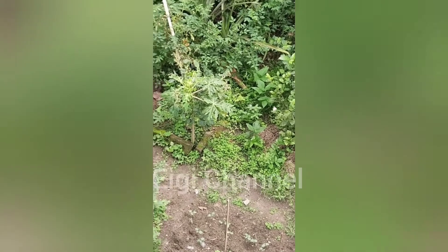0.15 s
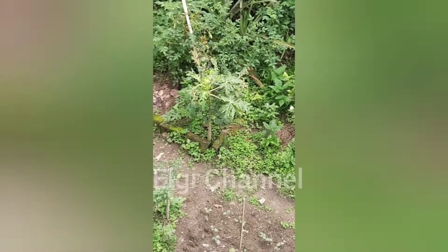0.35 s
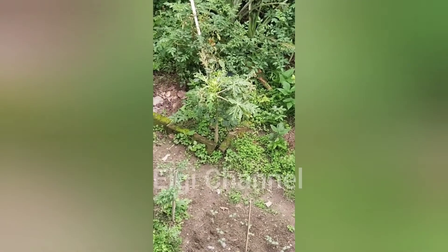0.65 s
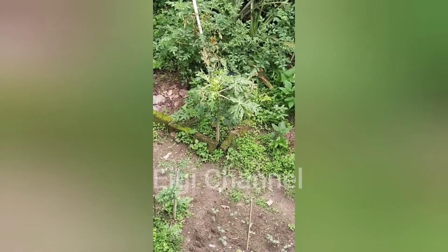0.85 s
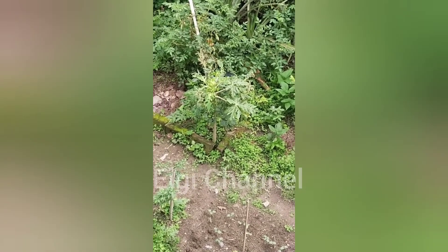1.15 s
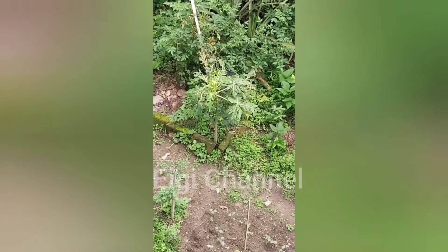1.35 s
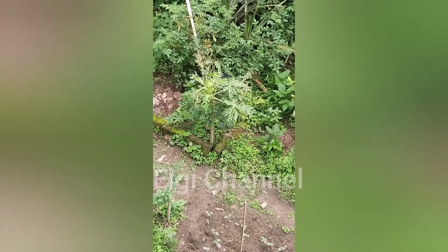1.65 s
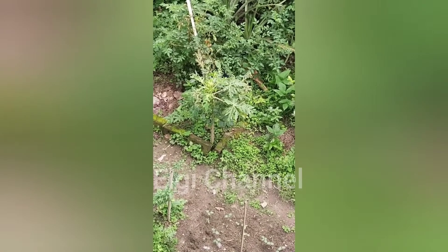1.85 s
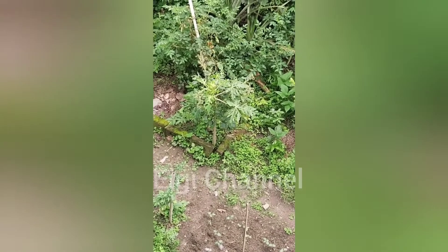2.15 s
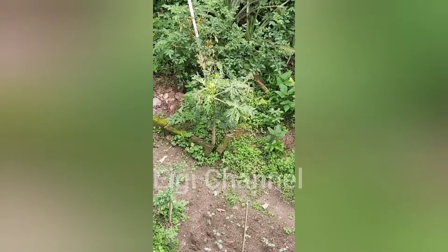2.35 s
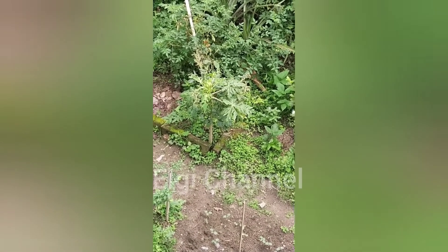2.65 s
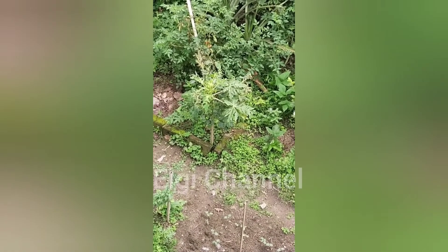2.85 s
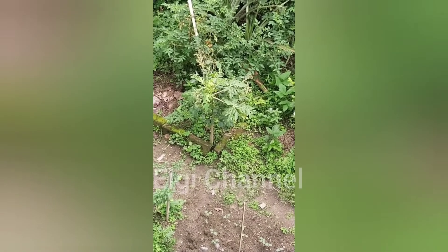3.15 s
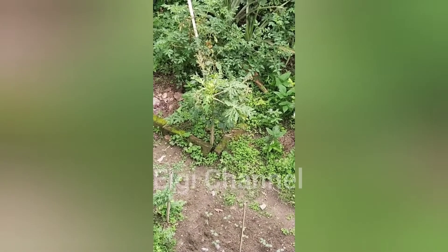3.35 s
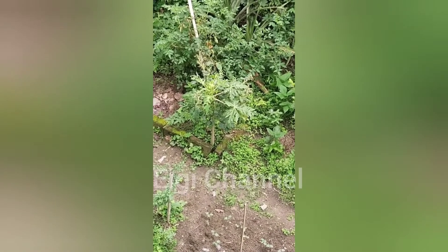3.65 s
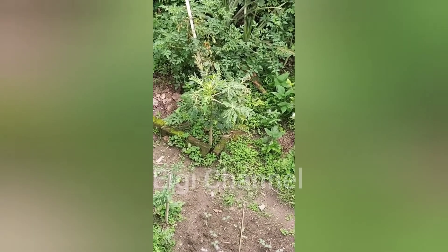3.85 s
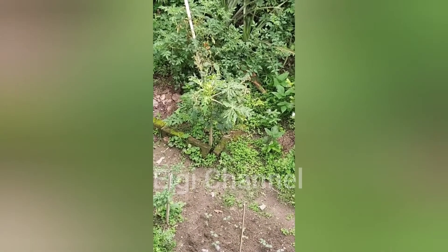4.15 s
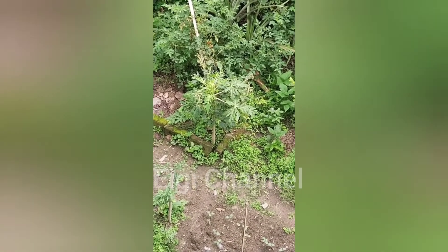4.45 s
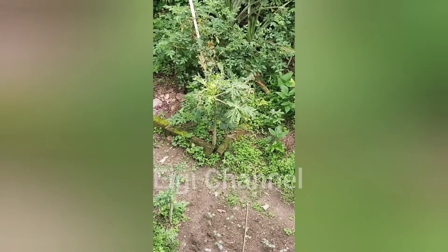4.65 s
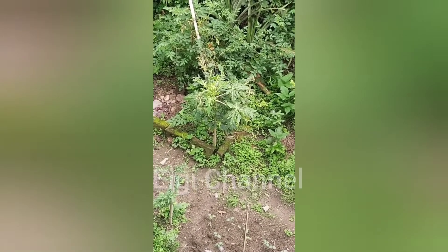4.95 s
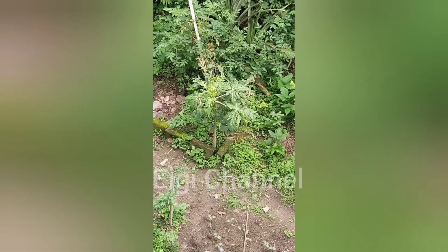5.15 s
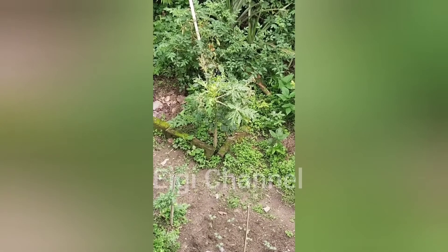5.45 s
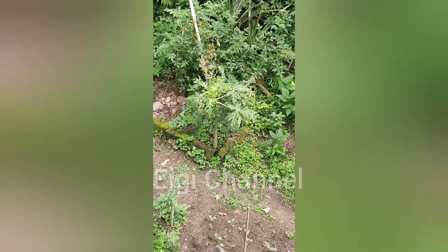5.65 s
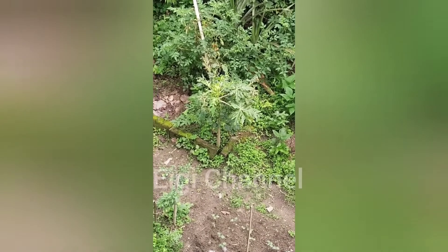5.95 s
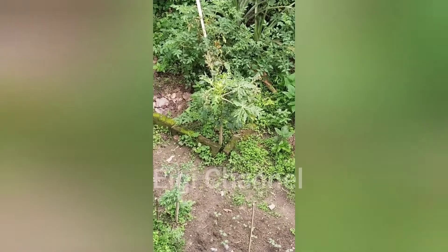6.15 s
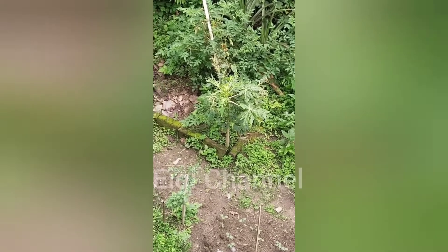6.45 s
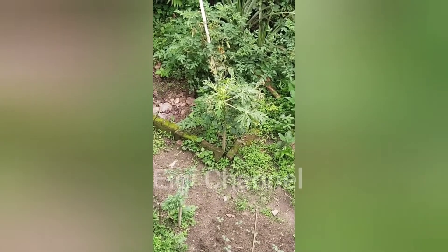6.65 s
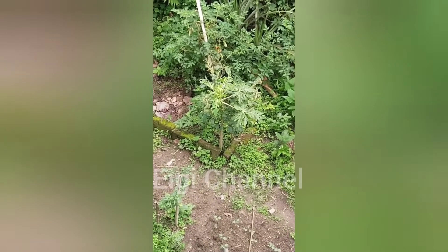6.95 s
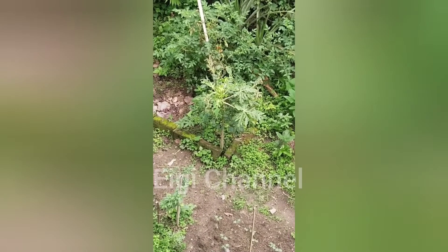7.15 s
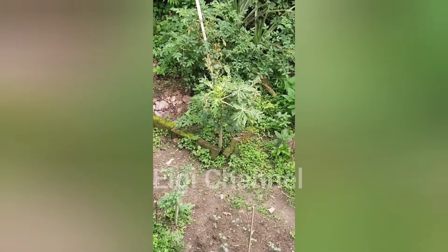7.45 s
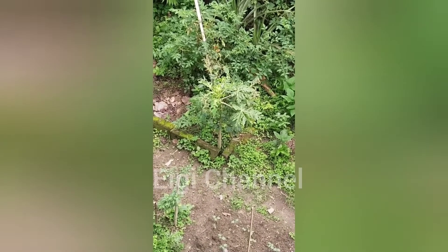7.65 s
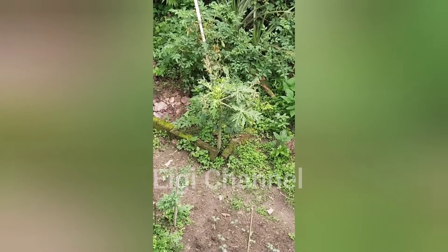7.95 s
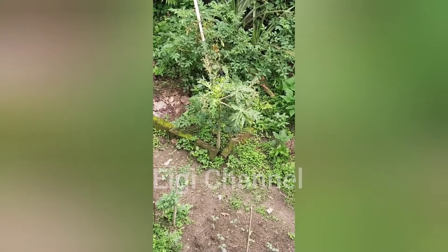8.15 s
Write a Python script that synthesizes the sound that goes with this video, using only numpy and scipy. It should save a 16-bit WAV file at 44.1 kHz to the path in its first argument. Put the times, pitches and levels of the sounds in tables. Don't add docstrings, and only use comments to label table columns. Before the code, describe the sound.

Outdoor garden, handheld stereo. On the right, a loud bird whistle is already near its crest at 0 s and drops away into a ringing echo. Further calls begin at about 1.8, 3.6, 5.6 and 8.0 s, each lasting roughly half a second: a sliding start near 1.1 kHz, a slow climb, a quick leap to about 1.3-1.4 kHz, then a hoarse fall. The third is loudest; the last is highest and runs to the end. Between calls are faint hoarse caws near 0.5, 3.3 and 4.7 s, dove coos from 2 to 5 s, distant engine hums at 1.3-3.2 s, and a brief leaf rustle around 4.1 s. Thin cricket buzzing near 7 and 9 kHz comes and goes over low distant traffic. The left side is muffled: scattered low finger creaks, strongest around 3.8-4.2 and 6.3-6.7 s, with dull pops at 1.4, 3.0 and 4.2 s.

```python
import sys
import numpy as np
from scipy import signal
from scipy.fft import rfft, irfft, next_fast_len
from scipy.io import wavfile
from scipy.ndimage import uniform_filter1d, map_coordinates

SR = 44100
rng = np.random.default_rng(int(sys.argv[2]) if len(sys.argv) > 2 else 0)


def convert_level_to_amplitude(level_db):
    exponent = np.asarray(level_db, float) / 20
    return 10 ** exponent


def unload_audio(sound):
    columns = np.transpose(np.atleast_2d(sound))
    steps = np.round(np.clip(columns, -1, 1) * 32767)
    wavfile.write(sys.argv[1], SR, steps.astype(np.int16))


N = 365148

# nearest t/s, width t/s, level/dB
DRONE = [(.2, 0.215, -56), (.72, 0.14, -64.5), (1.35, 0.298, -66), (2.0, 0.25, -62), (2.799, 0.58, -76),
         (4.1, .2, -58.5), (5.749, 0.2, -67), (6.4, 0.295, -65), (8.1, 0.106, -71)]
# f/Hz, level/dB per Hz
TRAFFIC = [(25, -34.5), (45, -14), (75, 3.5), (125, 6), (200, 0), (290, -10.5), (400, -19), (600, -23.5)]
DRONE_DB = -71.5
# f/Hz, level/dB per Hz
GARDEN = [(200, -104), (400, -104), (1200, -108.5), (2000, -111), (3000, -115), (4200, -119), (5500, -122),
          (6300, -114), (7600, -110), (9500, -116), (11000, -122), (13500, -124), (15400, -121)]
COVERED = [(40, -105), (70, -99), (120, -94), (200, -106), (280, -110), (700, -112), (2000, -114),
           (4500, -119), (6000, -122), (8500, -120), (13000, -123), (15500, -123)]
LEAK_DB = -42

# start t/s, end t/s, level/dB
LOW_SINGER = [(-2.5, 1.1, -78.5), (1.19, 2.1, -78), (2.5, 2.7, -77), (4, 3.35, -77), (3.5, 4.5, -75.5),
              (5, 6.03, -76), (6.5, 9, -74)]
HIGH_SINGER = [(.62, 1.85, -76.5), (2.8, 3.65, -79), (4.7, 5.8, -79.5), (6.6, 7.87, -76.5)]

# crest t/s, opening f/Hz, lowest f/Hz, crest f/Hz, early share of the rise [0-1]
KOEL = [
    (.056, 1096, 1070, 1268, 0.14),
    (2.11, 1115, 1048, 1319, .55),
    (3.95, 1165, 1137, 1388, .3),
    (5.997, 1150, 1119, 1412, .15),
    (8.36, 1230, 1150, 1438, .3),
]
# leap to the crest t/s, fall t/s
PACE = [(.065, .23), (.08, .23), (.08, .27), (.08, .28), (.08, .27)]
# t/s, whistle level/dB
EFFORT = [
    [(-.27, -55.5), (.002, -36.5), (.024, -26), (.042, -35.5), (.066, -28), (.084, -40), (.114, -27),
     (.15, -41.5), (.17, -51.5)],
    [(1.785, -50), (1.81, -36.5), (1.96, -27.5), (2.02, -27.5), (2.05, -37.5), (2.095, -20.5),
     (2.165, -35.5), (2.19, -30), (2.21, -50.5)],
    [(3.615, -47.5), (3.66, -30), (3.72, -34), (3.79, -28.5), (3.865, -30.5), (3.9, -16), (3.983, -21),
     (4.02, -33.5), (4.06, -48.5)],
    [(5.632, -56.5), (5.655, -41), (5.7, -34.5), (5.815, -29.5), (5.86, -37.5), (5.895, -30),
     (6.005, -24.5), (6.108, -33.5), (6.134, -55)],
    [(8.014, -57.5), (8.044, -35), (8.12, -32.5), (8.184, -40.5), (8.21, -27.5), (8.265, -36.5),
     (8.283, -21.5), (8.46, -34)],
]
# f/Hz, level/dB
BEAK = [(2000, -4), (2700, -9.5), (3600, -10), (4200, -10), (4500, -18), (5150, -25.5), (5500, -6.5),
        (5900, 1.5), (7000, -1), (8200, -5.5), (8950, -18), (9850, -4.5), (11300, -8.5), (12200, -22),
        (14300, -15), (15500, -16)]
# low partials level/dB, upper partials level/dB, low partials' gain at the crest level/dB
BEAK_OPEN = [(-1, 1.5, 3.5), (-5, -0.5, 4), (-8.5, 1.5, 12.5), (0, 2.5, 3.5), (-1, 1, 4)]
# opening catch level/dB, length ratio, top tilt/dB per octave, fourth partial level/dB
GAPE = [(-0.5, 0.982, 3.5, 0), (4, 1.02, 0.5, -4), (-9, .99, -0.09, 0), (-1, 0.984, -1.5, 1),
        (-3.5, 0.986, 2.5, 2)]
# fourth partial's gain at the crest, level/dB
FOURTH_CREST = [-7.5, 1.5, 9.5, -10, -6]
# strength of the hoarse ending, level/dB
RASP = [-3.5, 7, 9.5, 1.5, 0]
SCOOP, SCOOP_S, SETTLE_S = .14, .005, .045
CREEP_FROM_S, DROP_CURVE = .1, 1.6
COLLAPSE_S, COLLAPSE_DB = 0.084, -20
LOW_DB, LOW_FOLLOWS = -58.5, 0.21
HIGH_DB, HIGH_FOLLOWS, HIGH_LIFT_DB = -58, 0.28, 8
TOP_LIFT_DB = 3
CLOSING_DB = 4.5
FUZZ = .5
FACING = 0.3
CREST_CARRIES_DB = 4

# delay t/s, level/dB
WALL = [(.12, -33), (.19, -30), (.208, -29.5), (.226, -31), (.29, -35), (.36, -39.5)]
# f/Hz, time to fall 60 dB t/s
YARD = [(500, 0.68), (1300, 0.503), (3000, 0.85), (7000, 0.052), (14000, 0.16)]
HILL = [(500, 0.092), (2000, 1.63)]
LEAVES = [(1000, 0.4), (6000, 0.061), (14000, 0.26)]
ECHO_DB = -13
AIR_PATCH_DB, TAIL_PATCH_DB, FAR_PATCH_DB, COO_PATCH_DB = 2, 1, 1, 1.5

# start t/s, length t/s, centre f/Hz,
# width f/Hz, level/dB
FAR = [(0.024, 0.15, 247, 54, -49.5), (0.00079, 0.19, 570, 91, -57), (1.16, 0.16, 1970, 50, -72),
       (2.2, 0.23, 2450, 150, -76), (3.43, .2, 3880, 90, -70.5), (0.45, 0.11, 710, 100, -70.5),
       (.55, 0.243, 1120, 150, -67), (.66, 0.4, 3030, 710, -63.5), (.74, .25, 1850, 130, -72),
       (4.7, 0.31, 650, 97, -67), (0.22, 0.16, 2086, 65, -69), (0.126, 0.0845, 870, 550, -55.5),
       (0.13, 0.31, 2400, 1200, -64), (0.317, 0.154, 3520, 900, -68), (1.554, 0.35, 2348, 280, -68),
       (2.1, 0.23, 1340, 610, -58), (2.499, 0.12, 447, 19.6, -70), (2.6, 0.42, 2680, 150, -72),
       (1.33, 0.17, 460, 150, -64), (.52, 0.33, 2445, 110, -67.5), (4.9, 0.33, 2900, 45, -71),
       (3.0, .45, 650, 110, -69.5), (6.42, 0.25, 1010, 62, -72), (7.02, 0.17, 4540, 260, -77),
       (7.2, 0.13, 4500, 90, -82), (7.6, .15, 3350, 90, -79), (7.0, .16, 2800, 80, -77),
       (.5, 0.18, 2900, 70, -76), (.72, .3, 3450, 90, -72), (.9, .3, 2600, 70, -74.5),
       (1.7, 0.61, 700, 92, -69), (2.797, 0.149, 1052, 148, -61.5), (4.419, 0.172, 440, 168.5, -56),
       (4.449, 0.38, 1140, 740, -67), (4.678, 0.17, 430, 166, -59), (5.399, 0.14, 2893, 374, -67.5),
       (6.95, 0.28, 2350, 62, -73), (7.25, 0.17, 1070, 130, -70.5), (7.12, .1, 1290, 60, -76),
       (6.55, 0.27, 1230, 130, -73), (4.497, 0.43, 2900, 380, -76.5)]
# start t/s, length t/s, level/dB, brightness/dB per octave
CAWS = [
    (0.497, 0.61, -64.5, 9.5),
    (1.14, 0.4, -71, -14.5),
    (3.293, 0.65, -60, 2),
    (4.72, 0.692, -62.5, 0),
    (6.9, 0.36, -75.5, 4),
]
# f/Hz, width f/Hz, level/dB
CROW = [(1150, 180, -2), (1883, 150, -4), (2656, 130, -0.5), (3176, 150, -6), (3110, 730, -2),
        (3807, 420, -8.5)]
CAW_OPENS = .2

# start t/s, length t/s, slip rate f/Hz, peak level/dB
SLIPS = [(0.078, 0.242, 135, -59), (0.243, 0.129, 120, -51), (0.498, 0.085, 86.7, -51),
         (.68, 0.0332, 110, -52), (1.105, 0.07, 174, -61.5), (1.26, 0.021, 107, -62.5),
         (1.335, 0.11, 146, -50.5), (1.5, 0.144, 103, -65), (2.153, 0.089, 76, -60),
         (2.46, 0.064, 100, -69.5), (3.19, 0.0592, 97, -54), (4.212, 0.074, 91.4, -48.5),
         (5.74, 0.072, 89, -64), (6.221, 0.095, 92, -54.5), (6.313, 0.1246, 137, -48),
         (6.476, 0.041, 123, -42.5), (6.512, 0.058, 120, -47.5), (6.599, 0.13, 84, -65),
         (6.713, 0.055, 102, -48.5), (6.78, 0.078, 92.6, -65.5), (8.069, 0.1, 102, -54)]
# start t/s, length t/s, first slip rate f/Hz, last slip rate f/Hz, peak level/dB
STEADY = [
    (2.725, 0.072, 143, 118, -53),
    (3.84, 0.097, 97.7, 180.6, -43),
    (3.89, 0.061, 138, 118, -44.5),
    (4.055, 0.081, 73, 181.4, -43.5),
    (4.11, 0.1047, 110, 140, -36.5),
    (5.68, 0.067, 92, 172, -44.5),
    (6.95, 0.083, 183, 66, -52.5),
]
# t/s, peak level/dB, f/Hz
POPS = [
    (1.422, -40, 110),
    (2.988, -41, 129.3),
    (4.224, -37, 168),
    (4.499, -68, 202.5),
    (6.033, -52, 165),
    (6.204, -54, 212.7),
]
CREAK_SHARP, SLIP_SHARP, SLIP_SLOWS = 0.27, 0.2, 0.14

# start t/s, length t/s, first f/Hz, last f/Hz, level/dB
ENGINE = [
    (1.25, 0.4, 136.2, 135.3, -66.5),
    (1.75, 0.53, 136.4, 133.2, -65.5),
    (2.45, 0.8, 144.5, 137.3, -65.5),
]
# start t/s, length t/s, first f/Hz, last f/Hz, level/dB
DOVES = [(2.061, 0.11, 547, 661.2, -63), (2.317, 0.098, 586, 666, -63), (2.402, 0.12, 668, 596, -66.5),
         (2.501, 0.133, 649.5, 639.7, -73), (2.764, 0.044, 600, 630, -54),
         (2.793, 0.2957, 769.7, 701.3, -60), (3.072, 0.12, 639, 568.3, -66.5),
         (3.794, 0.14, 564, 648, -63.5), (3.857, 0.2, 730, 659.6, -67), (3.998, 0.28, 615, 551.8, -66),
         (4.526, 0.256, 547.4, 578, -68.5), (4.691, 0.1386, 576, 634.5, -62.5),
         (4.747, 0.09, 672, 697, -68), (4.824, 0.24, 645, 552.5, -67), (4.5, 0.209, 369, 379.4, -59.5),
         (4.702, 0.08, 360, 339.4, -59.5)]
# start t/s, length t/s, first f/Hz, last f/Hz, level/dB
PIPES = [
    (2.565, .12, 2760, 2844, -72),
    (2.65, .17, 2850, 2470, -71),
    (7.261, .16, 1080, 1058, -79.5),
]
COO_ATTACK_S, COO_RELEASE_S, COO_FADE_DB = 0.029, 0.033, -3
COO_ARCH = .015

# start t/s, end t/s, level/dB
RUSTLE = [(4.05, 4.34, -65)]
# f/Hz, level/dB per Hz
RUSTLE_COLOUR = [(940, -2), (1600, 1), (1920, -8.5), (2290, -2.5), (3510, -13.5), (7350, -3.5),
                 (8480, -16.5), (10800, -13.5), (15400, -24)]


def unit(x):
    return x / np.sqrt(np.mean(x ** 2) + 1e-20)


def along(points, hz):
    f, v = np.transpose(points)
    return np.interp(np.log(hz + 1), np.log(f + 1), v)


def gate(start, end, edge):
    t = np.arange(N) / SR
    return np.clip((t - start) / edge, 0, 1) * np.clip((end - t) / edge + 1, 0, 1)


def bouts(rows, rise_db_per_s, fall_db_per_s):
    t = np.arange(N) / SR
    gain = 0
    for start, end, db in rows:
        before = rise_db_per_s * np.maximum(start - t, 0)
        after = fall_db_per_s * np.maximum(t - end, 0)
        gain = gain + convert_level_to_amplitude(db - before - after)
    return gain


def wobble(rate):
    steps = np.arange(0, N + 16, 16)
    knots = rng.standard_normal(int(N * rate / SR) + 4)
    return np.interp(np.arange(N), steps, map_coordinates(knots, [steps * rate / SR]))


def hiss(gain, length=N):
    m = next_fast_len(length + 8192)
    spectrum = rfft(rng.standard_normal(m)) * gain(np.fft.rfftfreq(m, 1 / SR))
    return irfft(spectrum, m)[:length] * np.sqrt(SR / 2)


def coloured(points):
    return lambda hz: convert_level_to_amplitude(along([(1, -160), (20, -130)] + list(points), hz))


def bump(hz, width_hz):
    return lambda f: np.exp(-((f - hz) / width_hz) ** 2)


def turns(pitch_hz):
    return 2 * np.pi * np.cumsum(pitch_hz) / SR


def echoes(x, decay):
    hz, t, z = signal.stft(rng.standard_normal(SR), SR, nperseg=256)
    fading = z * convert_level_to_amplitude(-60 * t / along(decay, hz)[:, None])
    tail = signal.istft(fading, SR, nperseg=256)[1]
    return signal.fftconvolve(np.pad(x, (300, 0)), tail / np.linalg.norm(tail))[:N]


def patchy(x, depth_db):
    z = signal.stft(x, nperseg=512)[2]
    field = uniform_filter1d(rng.standard_normal(z.shape), size=5, axis=0)
    field = uniform_filter1d(field, size=9, axis=1)
    return signal.istft(z * convert_level_to_amplitude(depth_db * unit(field)), nperseg=512)[1][:N]


def traffic():
    t = np.arange(N) / SR
    swell = convert_level_to_amplitude(DRONE_DB) + sum(convert_level_to_amplitude(db) * np.exp(-((t - s) / width) ** 2) for s, width, db in DRONE)
    drone = swell * convert_level_to_amplitude(2.5 + 1.9 * wobble(13)) * unit(hiss(coloured(TRAFFIC + [(2000, -94.5)])))
    hum = convert_level_to_amplitude(-77.5 + 2 * wobble(1.5)) * unit(hiss(bump(281, 6.8)))
    return drone + hum


def garden_air():
    return patchy(hiss(coloured(GARDEN)), depth_db=AIR_PATCH_DB)


def covered_floor(voices):
    bright = np.diff(voices, n=2, prepend=[0, 0])
    loudness = np.sqrt(np.abs(uniform_filter1d(bright ** 2, size=3000)))
    return (1 + convert_level_to_amplitude(33) * loudness ** .7) * hiss(coloured(COVERED))


def wing_strokes(rate_hz, floor):
    phase = turns(rate_hz * (1 + 0.015 * wobble(1.5)))
    return floor + np.maximum(np.sin(phase), 0) ** 0.69


def crickets():
    low = hiss(bump(6860, 130)) + .3 * hiss(bump(6800, 320)) + 0.12 * hiss(bump(7450, 200))
    low = unit(wing_strokes(45.3, 0.73) * low)
    high = wing_strokes(118.9, 0.93) * hiss(bump(8760, 130))
    third = wing_strokes(112, .3) * hiss(bump(8600, 90))
    high = unit(high + 0.67 * third + 0.49 * hiss(bump(8280, 83)))
    low_gain = convert_level_to_amplitude(4 + 2.2 * wobble(4.7) + 1.8 * wobble(1.6))
    high_gain = convert_level_to_amplitude(3.5 + 1.3 * wobble(9.7) + 1.3 * wobble(2.9))
    return bouts(LOW_SINGER, 30, 30) * low_gain * low, bouts(HIGH_SINGER, 49, 120) * high_gain * high


def koel_tune(t, start, which):
    crest, opening_hz, low_hz, top_hz, creep = np.transpose(KOEL)[:, which]
    leap_s, drop_s = np.transpose(PACE)[:, which]
    age, late = np.maximum(t - start, 0), np.maximum(t - crest, 0)
    ramp = np.clip((age - CREEP_FROM_S) / (crest - start - CREEP_FROM_S), 0, 1)
    leap = np.exp(-(np.maximum(crest - t, 0) / leap_s) ** 1.8)
    rise = creep * ramp + (1 - creep) * leap
    settling = np.exp(-((age - .025) / SETTLE_S) ** 2)
    pitch = low_hz + (top_hz - low_hz) * rise + (opening_hz - low_hz) * settling
    pitch = pitch * (1 - SCOOP * np.exp(-age / SCOOP_S))
    pitch = pitch * np.maximum(1 - (late / drop_s) ** DROP_CURVE, .55)
    lift = np.clip((pitch - low_hz) / (top_hz - low_hz), -1, 1)
    return uniform_filter1d(pitch, size=500), lift


def koel_overtones(t, which, pitch, lift, phase, whistle_db):
    low_open_db, high_open_db, crest_db = np.transpose(BEAK_OPEN)[:, which]
    _, throat, tilt_db, fourth_db = np.transpose(GAPE)[:, which]
    fourth_db = fourth_db + np.take(FOURTH_CREST, which) * lift
    falling = t > np.transpose(KOEL)[0, which]
    low_db = LOW_DB + low_open_db + crest_db * np.maximum(lift, 0) + LOW_FOLLOWS * (whistle_db + 30.0)
    low_db = low_db - CLOSING_DB * (1 - lift) / 2 * falling
    high_db = HIGH_DB + high_open_db + HIGH_FOLLOWS * (whistle_db + 31.5) + HIGH_LIFT_DB * lift
    ladder = np.zeros(N)
    for k in range(2, 15):
        hz = k * pitch
        db = along(BEAK, hz * throat) + (1.2 + .5 * np.sqrt(k)) * wobble(18)
        db = db + (tilt_db + TOP_LIFT_DB * (lift - 1)) * np.log2(np.maximum(hz / 7000, 1))
        if k == 4:
            db = db + fourth_db
        if k < 4:
            db = db + low_db - high_db + 6.5
        tremor = 1 + FUZZ * wobble(170) if k < 5 else 1
        ladder += convert_level_to_amplitude(db) * tremor * np.sin(k * phase) * np.clip((15500 - hz) / 400, 0, 1)
    air = convert_level_to_amplitude(-11.0) * unit(hiss(coloured(BEAK)))
    return convert_level_to_amplitude(high_db - 3.0) * (ladder + air)


def koel():
    t = np.arange(N) / SR
    starts, ends = np.array([(call[0][0], call[-1][0]) for call in EFFORT]).T
    which = np.clip(np.searchsorted(starts - .1, t) - 1, 0, None)
    start, end = starts[which], ends[which]
    breath = []
    for call in EFFORT:
        last_s, last_db = call[-1]
        breath += list(call) + [(last_s + COLLAPSE_S, last_db + COLLAPSE_DB)]
    whistle_db = np.interp(t, *np.transpose(breath))

    def sounding(edge):
        return sum(gate(a, b + COLLAPSE_S, edge) for a, b in zip(starts, ends))

    pitch, lift = koel_tune(t, start, which)
    unsteady = .0012 + .12 * np.clip((t - end + .05) / .06, 0, 1)
    phase = turns(pitch * (1 + unsteady * wobble(260)))
    overtones = sounding(0.03) * koel_overtones(t, which, pitch, lift, phase, whistle_db)

    onset = convert_level_to_amplitude(-260 * np.maximum(t - start - .02, 0))
    catch_db = np.transpose(GAPE)[0, which]
    puff = convert_level_to_amplitude(-2.0 - catch_db) * onset ** 2 * unit(hiss(bump(1800, 750)))
    catch = convert_level_to_amplitude(-52 + catch_db) * onset * (np.sin(2 * phase) + puff)
    rasp = unit(hiss(lambda f: bump(1150, 330)(f) + .35 * bump(1600, 500)(f)))
    hoarse = convert_level_to_amplitude(-48 + np.take(RASP, which) - 450 * np.abs(t - end + .012)) * rasp
    skirt = convert_level_to_amplitude(whistle_db - 40) * unit(hiss(bump(1150, 450)))
    note = convert_level_to_amplitude(whistle_db + 5.0 + 1.2 * wobble(40)) * np.sin(phase)
    whistle = sounding(0.0067) * (note + catch + skirt) + hoarse

    near = whistle + patchy(overtones + echoes(overtones, LEAVES), depth_db=2.3)
    turned_db = -FACING * np.maximum(whistle_db + 35.0, 0)
    carried_db = CREST_CARRIES_DB * (np.maximum(lift, 0) - 0.77)
    sideways = whistle * convert_level_to_amplitude(turned_db + carried_db) * (1 + .7 * wobble(40))
    thrown = sum(convert_level_to_amplitude(db) * np.pad(sideways, (round(s * SR), 0))[:N] for s, db in WALL)
    yard = convert_level_to_amplitude(ECHO_DB) * echoes(whistle + overtones, YARD)
    hill = convert_level_to_amplitude(-17.5) * echoes(sideways, HILL)
    return near + patchy(thrown + yard + hill, depth_db=TAIL_PATCH_DB)


def far_birds():
    sounds = list(FAR)
    for s, length, db, bright in CAWS:
        for hz, width, part_db in CROW:
            late = CAW_OPENS * np.log2(hz / CROW[0][0])
            level_db = db - 6 + part_db + bright * np.log2(hz / 2000)
            sounds.append((s + 0.59 * late * length, (1 - late) * length, hz, width, level_db))
    out = np.zeros(N + SR)
    for s, length, hz, width_hz, db in sounds:
        n = round(length * SR)
        swell = np.sin(np.pi * np.arange(n) / n) ** 1.1
        throat_noise = unit(hiss(lambda f: 1 / (1 + ((f - hz) / width_hz) ** 2), n))
        out[round(s * SR):][:n] += convert_level_to_amplitude(db) * swell * throat_noise
    out = out[:N]
    return patchy(out + convert_level_to_amplitude(-6.5) * echoes(out, YARD), depth_db=FAR_PATCH_DB)


def finger():
    out = np.zeros(N + SR)
    pace, grip = wobble(55), wobble(60)
    slips = [(s, length, rate * (1 + SLIP_SLOWS), rate * (1 - SLIP_SLOWS), db)
             for s, length, rate, db in SLIPS]
    for table, uneven, sharp in ((STEADY, .03, CREAK_SHARP), (slips, .25, SLIP_SHARP)):
        for s, length, first_hz, last_hz, db in table:
            n = round(length * SR)
            u = np.arange(n) / n
            here = slice(round(s * SR), round(s * SR) + n)
            rate = (first_hz + (last_hz - first_hz) * u) * (1 + uneven * pace[here])
            phase = turns(rate) + rng.uniform(0, 2 * np.pi)
            train = sum(sharp ** (k - 1) * np.cos(k * phase + 0.42 * k) for k in range(1, 8))
            out[here] += convert_level_to_amplitude(db + 13 * uneven * grip[here]) * np.sin(np.pi * u) ** 0.59 * train
    t = np.arange(SR // 10) / SR
    for s, db, hz in POPS:
        ring = convert_level_to_amplitude(db + 12.0 - 60 * t / 0.021) * np.sin(2 * np.pi * hz * t)
        out[round(s * SR):][:len(t)] += ring * (1 - np.exp(-t / 0.00083))
    return out[:N] - uniform_filter1d(out[:N], size=700)


def engine_pulls_and_coos():
    out = np.zeros(N)
    sway_db, waver = 1.8 * wobble(25), 0.013 * wobble(60)
    for s, length, first_hz, last_hz, db in DOVES + PIPES + ENGINE:
        t = np.arange(round(length * SR)) / SR
        here = slice(round(s * SR), round(s * SR) + len(t))
        shape = np.clip(t / COO_ATTACK_S, 0, 1) * np.clip((length - t) / COO_RELEASE_S, 0, 1)
        shape = shape * convert_level_to_amplitude(COO_FADE_DB * t / length)
        slide = first_hz + (last_hz - first_hz) * t / length
        pitch = slide * (1 + COO_ARCH * np.sin(np.pi * t / length))
        tone = np.sin(turns(pitch * (1 + waver[here])))
        out[here] += shape * convert_level_to_amplitude(db + 9.0 + sway_db[here]) * tone
    return patchy(out + convert_level_to_amplitude(-5.0) * echoes(out * wobble(70), YARD), depth_db=COO_PATCH_DB)


def close_leaves():
    sweep = bouts(RUSTLE, rise_db_per_s=700.5, fall_db_per_s=130.0) * convert_level_to_amplitude(12.5 + 0.6 * wobble(35))
    return patchy(sweep * unit(hiss(coloured([(150, 1.7)] + RUSTLE_COLOUR))), depth_db=1.5)


def scene():
    low, high = crickets()
    bird = koel()
    others = far_birds() + engine_pulls_and_coos() + close_leaves()
    right = bird + others + low + high + traffic() + garden_air()
    scattered = echoes(convert_level_to_amplitude(-21.0) * others + convert_level_to_amplitude(-29.5) * high + convert_level_to_amplitude(-40) * low, LEAVES)
    left = convert_level_to_amplitude(LEAK_DB) * bird + scattered + finger() + covered_floor(bird + others)
    return np.array([left, right])


def thin_faint_bands(x):
    z = signal.stft(x, nperseg=1024)[2]
    bands = np.abs(z[:, :512]).reshape(2, 128, 4, -1).max(axis=2)
    luck = unit(uniform_filter1d(rng.standard_normal(bands.shape), size=18, axis=2))
    mask = uniform_filter1d(bands ** 2, size=9, axis=1) ** .5 * convert_level_to_amplitude(-12 + 6.5 * luck)
    mask = np.maximum(mask, bands.max(axis=1, keepdims=True) * convert_level_to_amplitude(-57 + 6 * luck))
    clear_tone = bands > 1.3 * uniform_filter1d(bands, size=5, axis=1)
    bass = (np.arange(128) < 12)[:, None]
    keep = (bands > mask) | clear_tone | bass
    z[:, :512] *= np.repeat(np.where(keep, 1, convert_level_to_amplitude(-16)), 4, axis=1)
    return signal.istft(z, nperseg=1024)[1][:, :N]


def band_limit(x):
    return signal.sosfilt(signal.butter(12, 15520, fs=SR, output="sos"), x)


def record(dry):
    mix = thin_faint_bands(dry)
    return band_limit(mix)


dry = scene()
out = record(dry)
unload_audio(out)
```